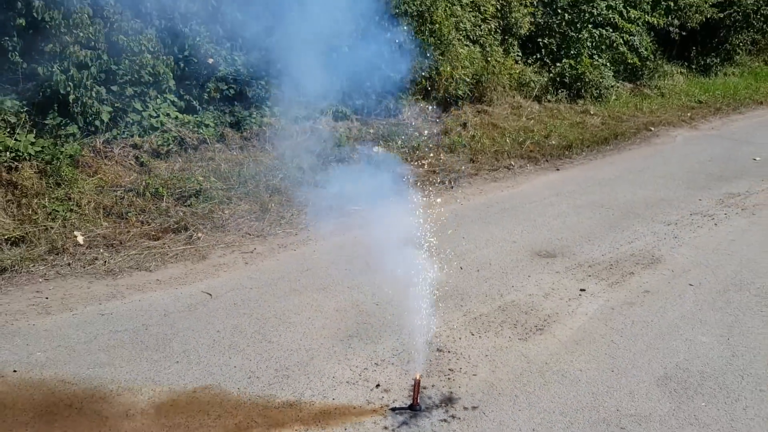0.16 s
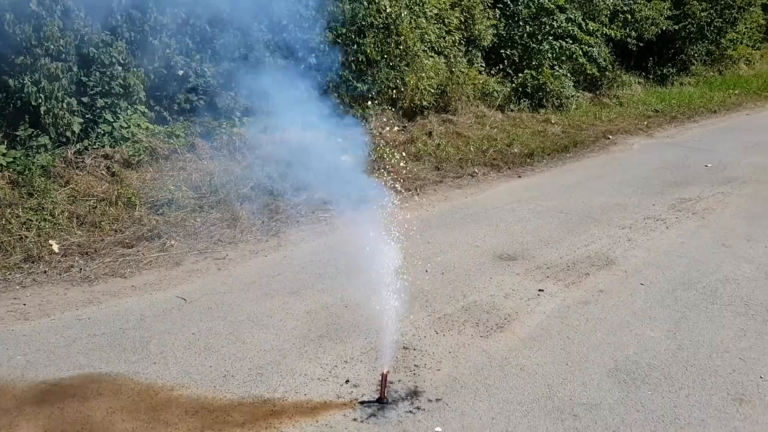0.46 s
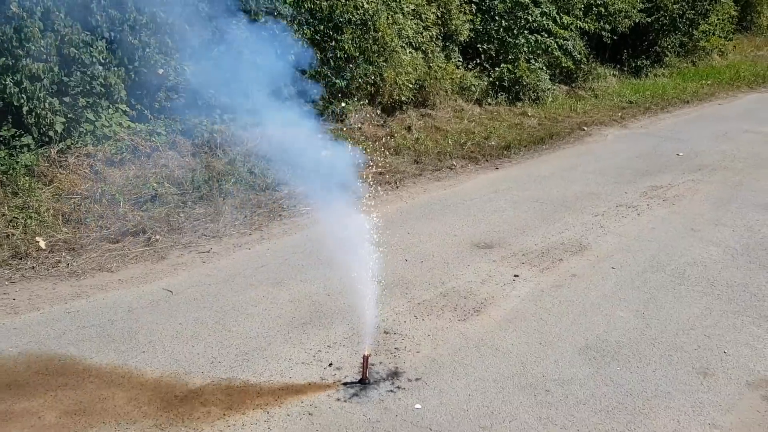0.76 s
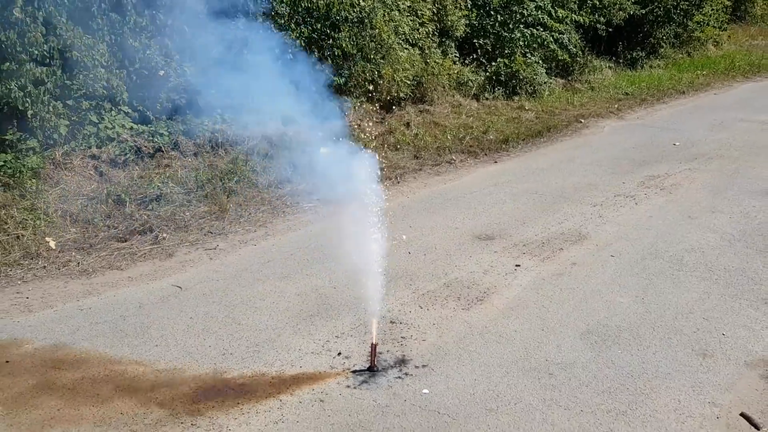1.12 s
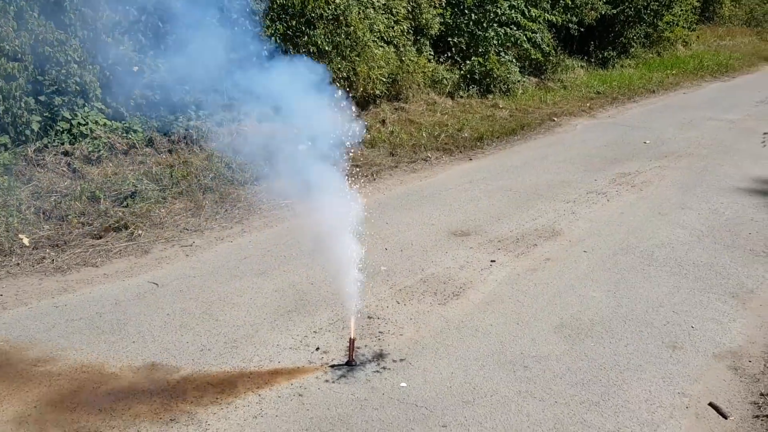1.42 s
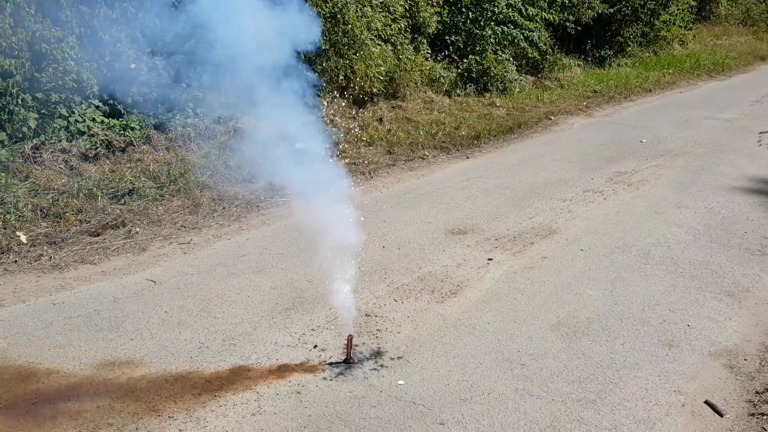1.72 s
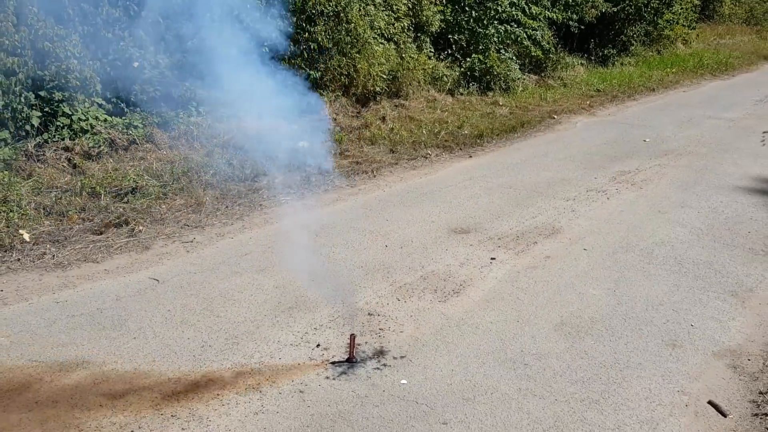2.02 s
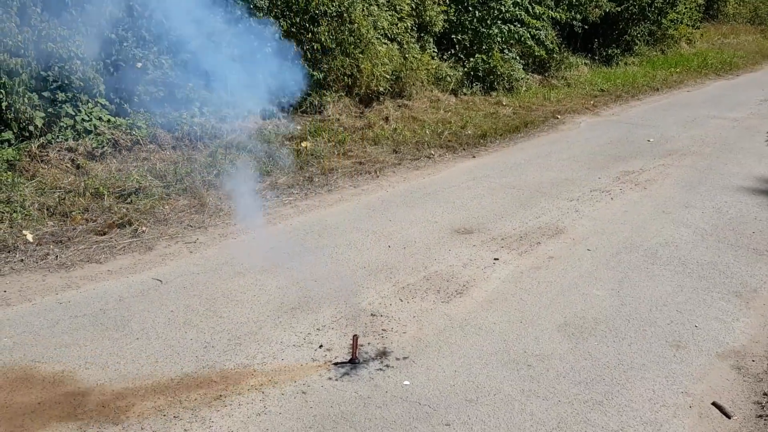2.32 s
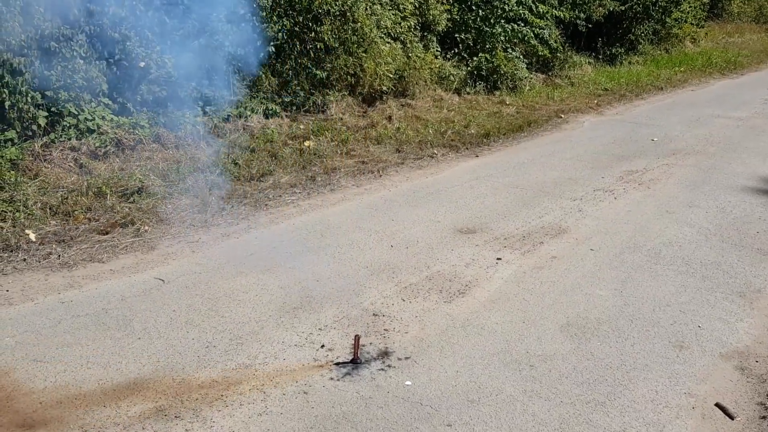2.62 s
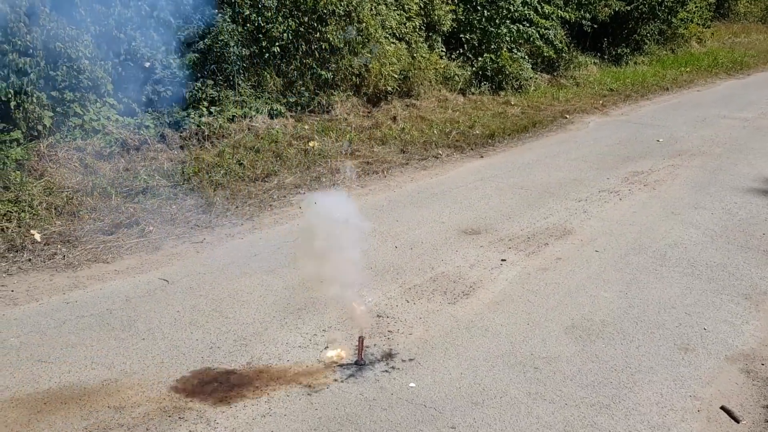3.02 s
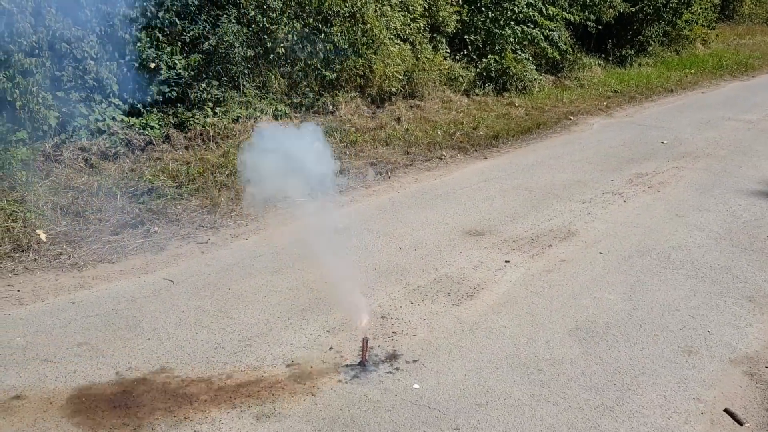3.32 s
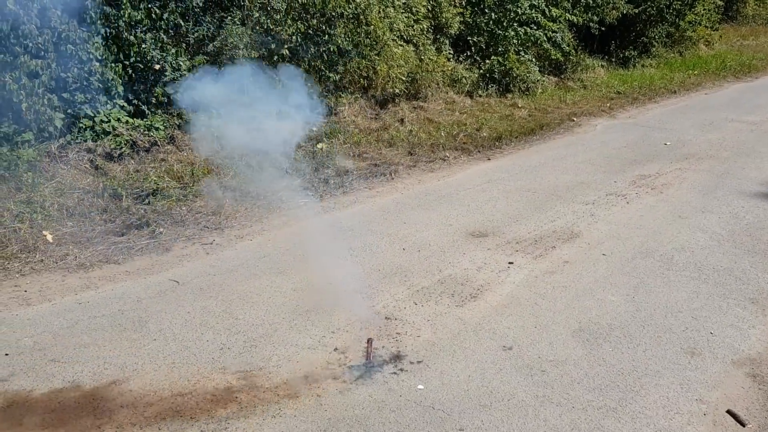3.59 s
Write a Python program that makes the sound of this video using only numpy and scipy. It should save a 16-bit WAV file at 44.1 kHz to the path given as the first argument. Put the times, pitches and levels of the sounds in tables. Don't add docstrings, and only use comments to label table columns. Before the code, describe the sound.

Firework on a road: piercing falling whistle, fading gas hiss, faint fuse ticks, then dense violent crackling.

```python
import sys
import numpy as np
from scipy import signal
from scipy.fft import rfft, irfft
from scipy.io import wavfile
from scipy.ndimage import uniform_filter1d

SR = 44100
rng = np.random.default_rng(int(sys.argv[2]) if len(sys.argv) > 2 else 0)


def voltage_ratio(level):
    return 10 ** (np.asarray(level, float) / 20)


def wav_record(signal):
    frames = np.transpose(np.atleast_2d(signal))
    bounded = np.clip(frames, -1, 1)
    quanta = np.round(bounded * 32767).astype(np.int16)
    wavfile.write(sys.argv[1], SR, quanta)


N = 165375
TIME_S = np.arange(N) / SR
LEFT_ONLY = np.array([[1], [0]])


def curve(table, col=1):
    a = np.array(table, float)
    return np.interp(TIME_S, a[:, 0], a[:, col])


def colour(x, points):
    a = np.array(points, float)
    hz = np.maximum(np.arange(1025) * SR / 2048, 1)
    log_gain = np.interp(np.log(hz), np.log(a[:, 0]), a[:, 1]) * np.log(10) / 20
    cepstrum = irfft(log_gain)
    cepstrum[1:1024] *= 2
    cepstrum[1025:] = 0
    response = irfft(np.exp(rfft(cepstrum)))
    return signal.fftconvolve(x, response[None], axes=1)[:, :N]


def walk(rate):
    hold = int(SR / rate)
    steps = np.repeat(rng.standard_normal(N // 20), hold)[:N]
    return 1.3 * uniform_filter1d(uniform_filter1d(steps, hold), hold)


def sides(pan_db):
    angle = np.arctan(voltage_ratio(-np.asarray(pan_db)))
    return np.sqrt(2) * np.array([np.cos(angle), np.sin(angle)])


def bands(points, own_hz, flicker_db):
    hz = np.fft.rfftfreq(N, 1 / SR)
    a = np.array(points, float)
    shape = voltage_ratio(np.interp(np.log(hz + 1), np.log(a[:, 0]), a[:, 1]))
    mid, side = rfft(rng.standard_normal((2, N))) * shape
    side = side * hz / np.hypot(hz, own_hz)
    both = np.array([mid + side, mid - side])
    out = 0
    for octave in np.arange(4.5, 14.5, .5):
        weight = np.cos(np.pi * np.clip(np.log2(hz + 1) - octave, -.5, .5)) ** 2
        out = out + irfft(weight * both, N) * voltage_ratio(flicker_db * walk(6.7))
    return out / out.std()


# start_s [s], pitch_hz [Hz]
WHISTLE_PITCH = [(0, 3936), (.09, 3900), (.115, 3824), (.19, 3784), (.25, 3735), (.3, 3722), (.37, 3670),
                 (.43, 3601), (.54, 3534), (.69, 3469), (.74, 3413), (.82, 3381), (.89, 3350), (.94, 3269),
                 (.98, 3293), (1.05, 3235), (1.14, 3133), (1.25, 3000)]
# start_s [s], level_db [dB], left_over_right_db [dB], left_lead_rad [rad]
WHISTLE_LEVEL = [(0, -14.5, 1, 0.1), (.04, -12, -7.5, -4), (.08, -15, 0, -5), (.11, -11, 5, -7),
                 (.14, -14, .9, -7.5), (.2, -14.5, -9, -7.5), (.23, -8, -9, -10), (.27, -12.5, -1.5, -11),
                 (.33, -14, 6, -11.5), (.41, -12.5, 32, -8.5), (.62, -14, 24, -7.5), (.7, -17, 8, -6.5),
                 (.74, -16, 4, -8), (.82, -13.5, -1.5, -8), (.89, -17.5, -6, -9.5), (.94, -19.5, 9, -12),
                 (.98, -19, 7, -11.5)]
# multiple [of pitch], level_column [in OVERTONE_LEVEL], trim_db [dB],
# early_left_lead_rad [rad], late_left_lead_rad [rad]
WHISTLE_OVERTONES = [
    (2, 1, 0, -2.6, -2.6),
    (3, 2, 0, .4, -2.4),
    (4, 2, -13, 2.0, 2.0),
]
# start_s [s], second_db [dB], third_db [dB]
OVERTONE_LEVEL = [(0, -32, -29), (.15, -27, -21), (.36, -35, -27), (.45, -29, -34.5), (.55, -24.5, -32),
                  (.68, -26.5, -31), (.76, -25, -28), (.86, -25.5, -33.5), (.97, -30, -37.5),
                  (1.09, -46, -66), (1.2, -91, -95)]


def whistle():
    fades_s, fade_db_s = 0.99, -125
    drop_s, drop_db, stub_s = 1.078, -12, .055
    wobble, flutter_db, breath_db = .0018, .9, -22
    lead_turns_s = 0.42

    waver = 1 + wobble * (.3 * walk(30) + 1.79 * walk(200))
    phase = 2 * np.pi * np.cumsum(curve(WHISTLE_PITCH) * waver) / SR
    fading_s = np.maximum(TIME_S - fades_s, 0) - np.clip(TIME_S - drop_s, 0, stub_s)
    level_db = curve(WHISTLE_LEVEL) + fade_db_s * fading_s

    tone = np.sin(phase + LEFT_ONLY * curve(WHISTLE_LEVEL, 3))
    tone = tone * sides(curve(WHISTLE_LEVEL, 2)) * voltage_ratio([flutter_db * walk(150), flutter_db * walk(220)])
    tone = tone * voltage_ratio(drop_db * np.clip((TIME_S - drop_s) / 0.017, 0, 1))
    breath = []
    for _ in "LR":
        in_step, off_step = walk(110) + walk(500), walk(110) + walk(500)
        breath.append(in_step * np.sin(phase) + off_step * np.cos(phase))
    tone = tone + voltage_ratio(breath_db) * np.array(breath)
    tone = tone * voltage_ratio(level_db - 400 * np.maximum(TIME_S - drop_s - stub_s, 0))

    turn = np.clip((TIME_S - lead_turns_s) / 0.039 + .5, 0, 1)
    port_db = 3.4 * np.array([[1], [-1]])
    for multiple, col, trim_db, early, late in WHISTLE_OVERTONES:
        drift = voltage_ratio([1.5 * walk(25) + 1.5 * walk(90), 2.5 * walk(25) + 1.5 * walk(90)])
        lead = early + (late - early) * turn
        strength = voltage_ratio(curve(OVERTONE_LEVEL, col) + trim_db + port_db) * drift
        tone = tone + strength * np.sin(multiple * phase + LEFT_ONLY * lead)
    return np.sqrt(2) * tone


# start_s [s], level_db [dB]
JET_LEVEL = [(0, -34.5), (.34, -34), (.85, -37), (1.05, -40.5), (1.62, -41.5), (1.712, -42.5), (1.733, -37),
             (1.762, -48), (1.83, -56), (1.89, -59), (1.925, -70), (2.0, -80)]
# pitch_hz [Hz], level_db [dB]
JET_TONE = [(300, -9), (1200, -7.5), (2900, 0), (5000, -8), (7200, -4.5), (9000, -8), (13000, 1.5),
            (16000, -11)]


def jet():
    puff_s, puff_len_s, puff_db, puff_hz = 1.728, .012, -32, 320
    fizzle_db, fizzle_db_s = -53.5, -60

    puff_band = signal.butter(2, [puff_hz / 2, puff_hz * 2], "band", fs=SR, output="sos")
    puff = signal.sosfilt(puff_band, rng.standard_normal(N))
    puff = voltage_ratio(puff_db) * puff / puff.std() * np.exp(-((TIME_S - puff_s) / puff_len_s) ** 2)
    hiss = bands(JET_TONE, 900, 1.2)
    fizzle = np.diff(hiss, 2, prepend=0, append=0)
    fizzle = fizzle * voltage_ratio(fizzle_db + fizzle_db_s * np.maximum(TIME_S - puff_s, 0))
    return hiss * voltage_ratio(curve(JET_LEVEL)) + fizzle + puff


# start_s [s], level_db [dB], low_part_db [dB]
FIRST_STARS = [(2.736, -11, -7), (2.7873, -14, -5), (2.8028, -15.5, -7.5), (2.82, -8, -10),
               (2.822, -11, -7), (2.8269, -10.5, -5), (2.832, -12, -13.5), (2.8482, -13.5, -28),
               (2.858, -15, 0), (2.8618, -12, -6), (2.8682, -5.5, -6), (2.8765, -3.5, -12),
               (2.892, -24, -16), (2.895, -14.5, -8.5), (2.9168, -16, -2), (2.9259, -4, -1.5),
               (2.938, -16, -9), (2.9591, -20.5, -26), (2.9634, -11.5, -8.5), (2.972, -7.5, -13.5),
               (2.9791, -8, -11.5), (2.9875, -5.5, -13.5), (2.991, -13.5, -9), (2.998, -5, -6.5),
               (3.012, -13.5, -14), (3.026, -22, -10.5), (3.0328, -6, -13.5), (3.0393, 0.5, -9.5),
               (3.0505, -21, 1), (3.0588, -6, -21.5)]
# start_s [s], level_db [dB], low_part_db [dB]
LATER_STARS = [(3.074, -20, 5), (3.0841, -10.5, -9.5), (3.1002, -4.5, -6), (3.136, -14.5, -10),
               (3.143, -21, -4.5), (3.155, -13.5, -2.5), (3.1682, -17.5, -4), (3.1726, -13, -21),
               (3.1796, -9, -0.5), (3.1939, -5, -12), (3.2455, -3, -7.5), (3.2533, -6.5, -18),
               (3.2662, -16.5, -55), (3.2954, 2.5, -9.5), (3.3016, -10.5, -11.5), (3.3155, -5, -3.5),
               (3.32, -6, -12.5), (3.3384, -11.5, -22), (3.3606, -8, -2), (3.3813, -12.5, -22),
               (3.3859, -10, -16.5), (3.4205, -8, -12.5), (3.4258, -16, -1.5), (3.4823, -3.5, -4.5),
               (3.4899, -17, -9), (3.505, -20.5, -1), (3.5352, -18.5, -17), (3.5609, -6.5, -1.5),
               (3.6087, -7.5, -3.5), (3.653, -14, -5.5)]


def swarm():
    scatter_s, level_db, spread_db = .014, -26, 3
    stars = np.repeat(np.r_[FIRST_STARS, LATER_STARS], 4, axis=0)
    chance = rng.random((len(stars), 3))
    start_s = stars[:, 0] + .003 - scatter_s * np.log(chance[:, 0] + .02)
    spark_db = stars[:, 1] + level_db - spread_db * np.log(chance[:, 1] + .08)
    return np.c_[start_s, spark_db, -14 * chance[:, 2]]


# start_s [s], level_db [dB], low_part_db [dB]
FUSE_TICKS = [(2.0545, -41.5, -25), (2.1213, -43, -20), (2.1817, -37.5, -20), (2.205, -39, -11),
              (2.280, -45, -16), (2.477, -33.5, 6.5), (2.5544, -37, -3), (2.6092, -39.5, 9),
              (2.6606, -29, -2), (2.727, -20.5, -5.5), (2.772, -36, 3), (3.057, -1, -3.5),
              (3.193, -12, -10), (3.2428, -5, -7), (3.473, -29.5, -10), (3.5825, -19, -1.5),
              (3.663, -34, -16), (3.7335, -34, -2.5), (3.741, -41, -1.5)]
# pitch_hz [Hz], level_db [dB]
SNAP_TONE = [(280, -9), (520, -3.5), (900, -6.5), (1900, -3), (3000, -6.5), (6500, 0.5), (8500, -10),
             (11500, -6.5), (16000, -6)]


def snaps():
    burst_s, bounce_s, bounce_db = 0.0013, 0.0023, -12
    likeness = 0.62
    split_hz, port_lag = 2880, 4

    u = np.arange(256) / SR
    direct = np.exp(-((u - 0.00092) / (burst_s / 2)) ** 4)
    bounce = np.exp(-((u - (0.0011 + bounce_s)) / (burst_s * 0.74)) ** 4)
    envelope = direct + voltage_ratio(bounce_db) * bounce
    low, high = np.zeros((2, 2, N + 256))
    for start_s, level_db, low_db in np.r_[FUSE_TICKS, FIRST_STARS, LATER_STARS, swarm()]:
        noise = rng.standard_normal((2, 3, 256))
        noise = np.sqrt(likeness) * noise[:, :1] + np.sqrt(1 - likeness) * noise[:, 1:]
        noise = noise * envelope
        noise = noise / np.sqrt((noise[..., :66] ** 2).sum(2, keepdims=True) / 40)
        i = int((start_s - .001) * SR)
        low[:, i:i + 256] += voltage_ratio(level_db + low_db + 10.0) * noise[0]
        high[:, i:i + 256] += voltage_ratio(level_db) * noise[1]
    low = signal.sosfilt(signal.butter(2, split_hz, "low", fs=SR, output="sos"), low)
    high = signal.sosfilt(signal.butter(2, split_hz, "high", fs=SR, output="sos"), high)
    near = colour(low + high, SNAP_TONE) * voltage_ratio(7.0)
    near[1] = np.roll(near[1], port_lag)
    return near


# start_s [s], level_db [dB]
HEDGE_ANSWER = [(2.7, -5), (2.8, 0), (2.85, 0), (2.885, 3), (2.93, -5), (2.98, -1), (3.03, -3), (3.07, -2),
                (3.11, 1), (3.2, -1), (3.25, -5), (3.3, -4), (3.37, -4), (3.42, -3), (3.49, -9), (3.56, -3),
                (3.61, 2), (3.75, 0)]


def hedges(near):
    v = np.arange(SR // 3) / SR

    def decay(t60_s):
        return voltage_ratio(-60 * v / t60_s)

    def unit(envelope):
        return envelope / np.sqrt((envelope ** 2).sum())

    hedge = voltage_ratio(-15) * unit((1 - np.exp(-(v / .022) ** 2)) * decay(0.12))
    verge = voltage_ratio(-16) * unit(decay(.016))
    field = voltage_ratio(-29) * unit(decay(.45))
    tail = np.hypot(hedge + verge, field)
    leaves = voltage_ratio(5.5 * walk(377)[:len(v)]) * rng.standard_normal((2, len(v)))
    far = signal.fftconvolve(near * voltage_ratio(curve(HEDGE_ANSWER)), tail * leaves, axes=1)[:, :N]
    return colour(far, [(500, -9.5), (2000, 0.5), (3100, 3), (5000, 3.5), (9000, -1.5), (16000, 7)])


def crackle():
    near = snaps()
    return near + hedges(near)


# start_s [s], level_db [dB], left_over_right_db [dB]
SHOCKS = [
    (2.737, -27, 30),
    (2.786, -2.5, 13),
    (2.9898, -7.5, -23),
    (3.1007, -7.5, -42),
    (3.1788, -3.5, 1.5),
    (3.5613, -11, -13),
    (3.587, -31, -23),
    (3.609, -8, -13.5),
]


def thumps():
    ring_hz, ring_s = 55.1, 0.017
    sweep_turns, sweep_s = 0.34, 0.0022
    port_lag = 20

    u = np.arange(4000) / SR
    sweep = np.exp(-u / sweep_s)
    ring = np.cos(2 * np.pi * (ring_hz * u + sweep_turns * (1 - sweep)))
    ring = ring * np.exp(-((u - .008) / ring_s) ** 2)
    ring = ring * np.minimum(u / 0.000097, 1) * (1 + 1.46 * sweep)
    out = np.zeros((2, N + 4000))
    for start_s, level_db, pan_db in SHOCKS:
        i = int(start_s * SR)
        out[:, i:i + 4000] += voltage_ratio(level_db) * sides(pan_db)[:, None] * ring
    return np.array([out[0, :N], np.roll(out[1], port_lag)[:N]])


# start_s [s], level_db [dB]
ROAD_LEVEL = [(0, -49.5), (1.9, -41.5), (2.15, -41.5), (2.6, -38.5), (3.75, -48)]
# pitch_hz [Hz], level_db [dB]
ROAD_TONE = [(30, -16.5), (80, 3), (190, -14), (300, -9.5), (1000, -16), (2200, -19), (3100, -36),
             (10000, -43.5)]


def road():
    drone_hz, sag_hz_s, drone_db = 802, -40.5, -55.5
    pitch_hz = drone_hz + sag_hz_s * (TIME_S - 1) + 14 * walk(40)
    drone = np.sin(2 * np.pi * np.cumsum(pitch_hz) / SR)
    fade_out_db = 60 * np.maximum(TIME_S - 2.5, 0)
    fade_in_db = 35 * np.maximum(1.25 - TIME_S, 0)
    drone = drone * voltage_ratio(drone_db + 5.0 * walk(16) - fade_out_db - fade_in_db)
    return bands(ROAD_TONE, 730, 3.9) * voltage_ratio(curve(ROAD_LEVEL)) + drone


# start_s [s], pitch_hz [Hz], level_db [dB]
TUBE_BREATH = [(1.05, 3150, -75), (1.2, 3000, -51), (1.55, 2650, -49.5), (1.72, 2580, -55),
               (1.77, 2550, -75)]


def tube():
    phase = 2 * np.pi * np.cumsum(curve(TUBE_BREATH)) / SR
    breath = [walk(500) * np.sin(phase) + walk(500) * np.cos(phase) for _ in "LR"]
    return voltage_ratio(curve(TUBE_BREATH, 2)) * np.array(breath)


def scene():
    return whistle() + jet() + crackle() + thumps() + road() + tube()


def top_cut(x):
    return signal.sosfilt(signal.butter(12, 16480, fs=SR, output="sos"), x)


def record(dry):
    camera_sr, top_hz = 48000, 16000
    camera = np.clip(signal.resample_poly(dry, 160, 147, axis=1), -1, 1)
    picked = camera[:, np.arange(N) * camera_sr // SR]
    heard = signal.sosfilt(signal.ellip(6, .3, 40, top_hz, fs=SR, output="sos"), picked)
    mix = np.clip(heard, -1, 1)
    return top_cut(mix)


dry = scene()
out = record(dry)
wav_record(out)
```